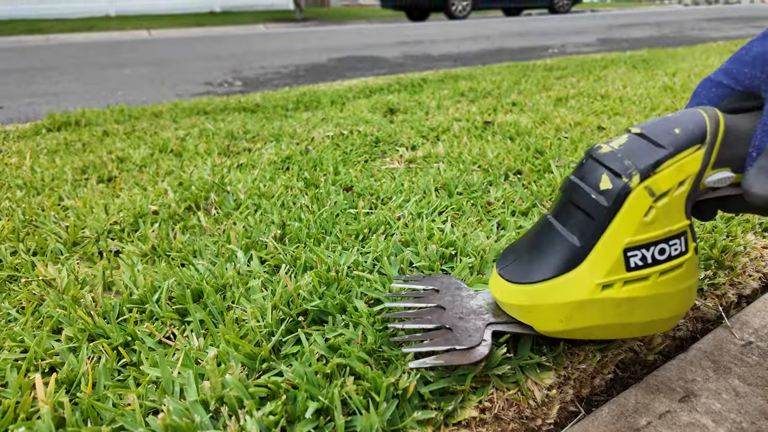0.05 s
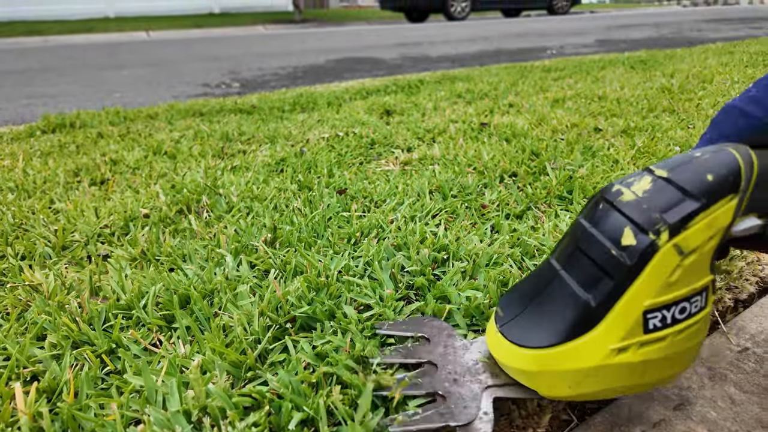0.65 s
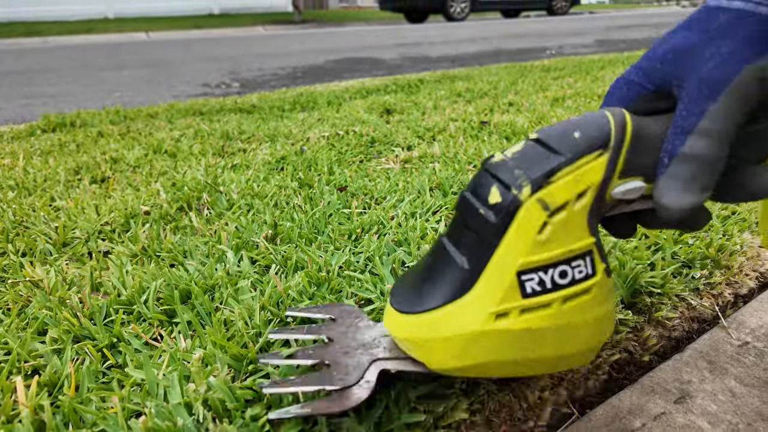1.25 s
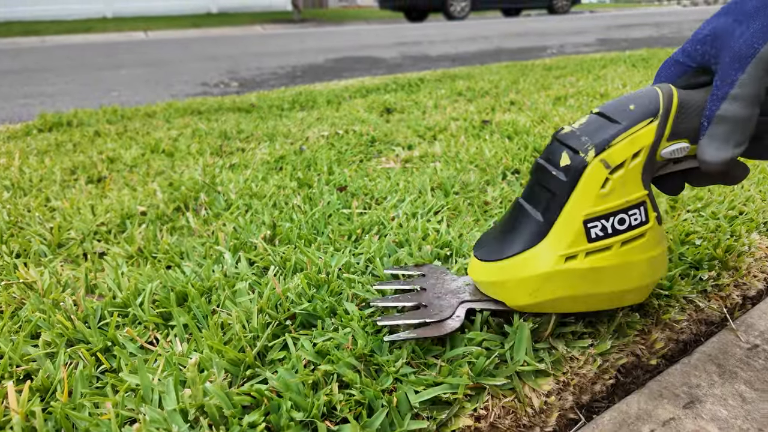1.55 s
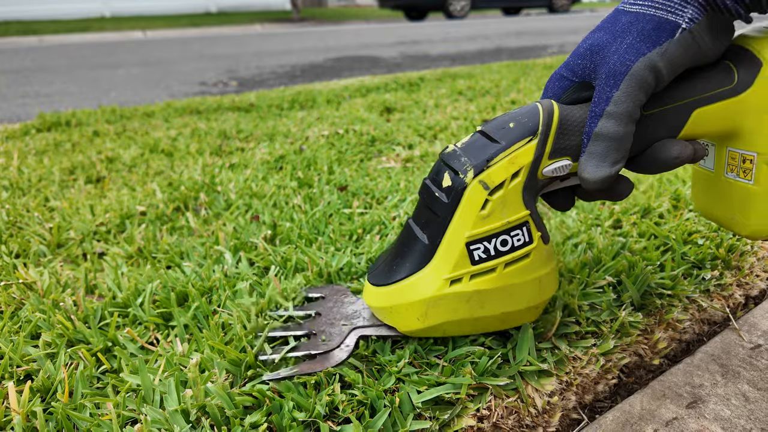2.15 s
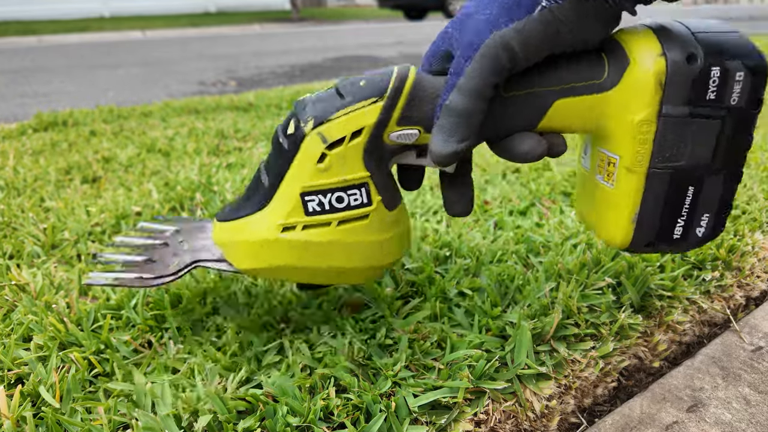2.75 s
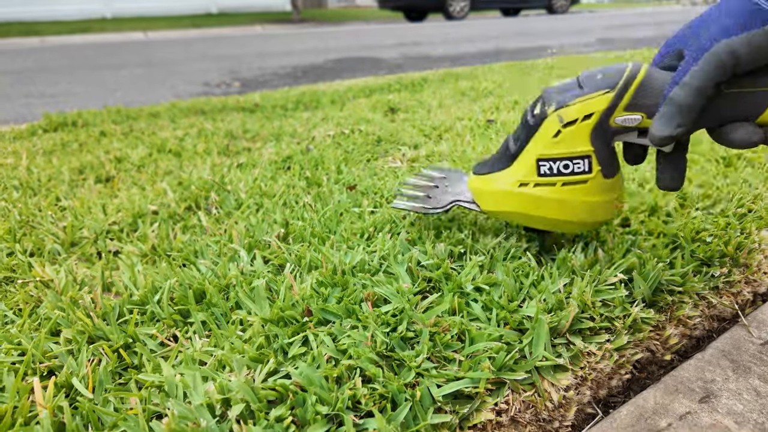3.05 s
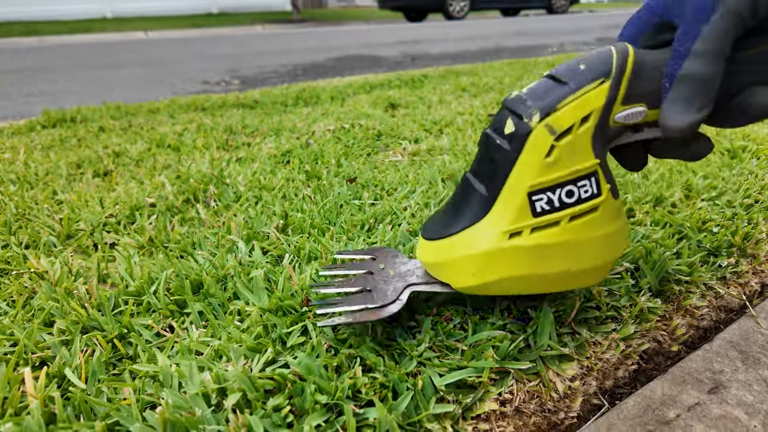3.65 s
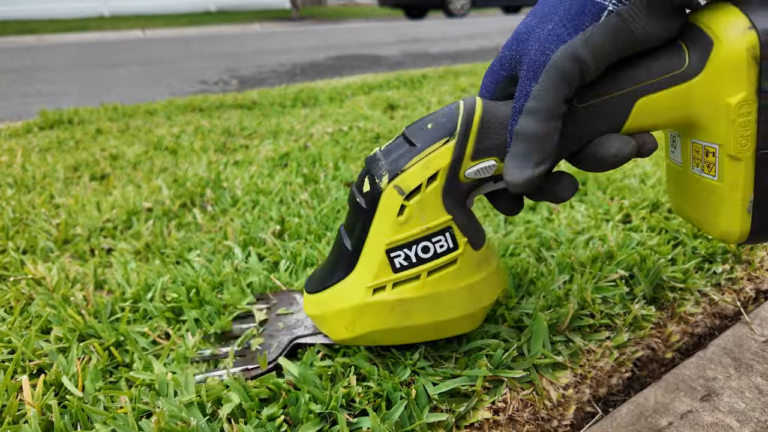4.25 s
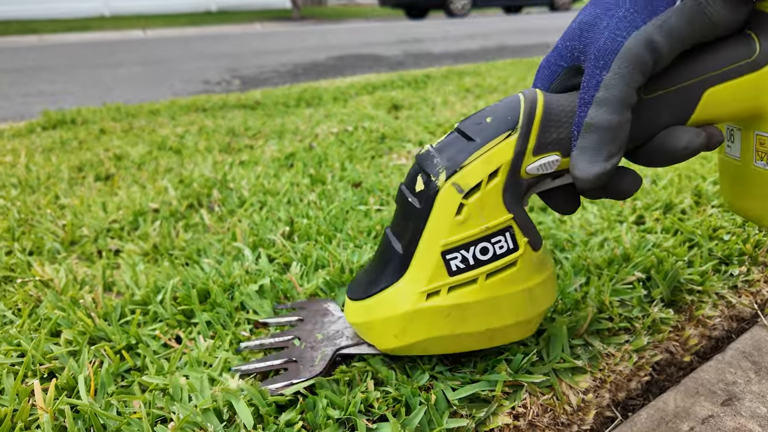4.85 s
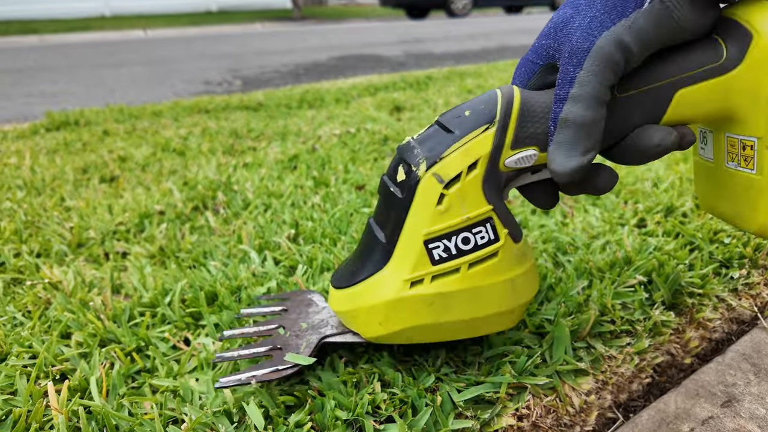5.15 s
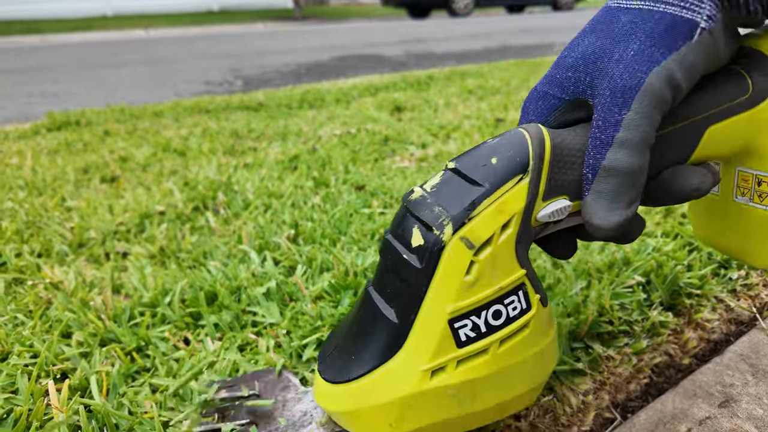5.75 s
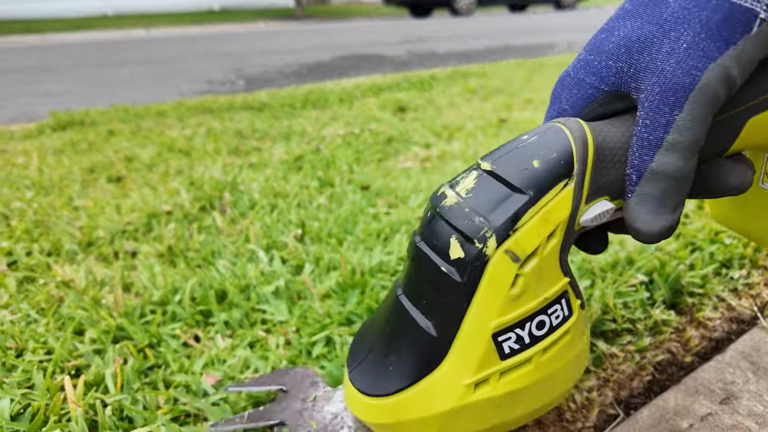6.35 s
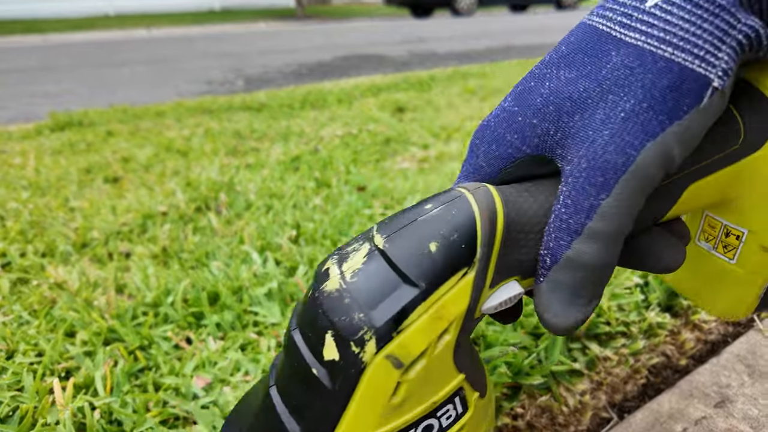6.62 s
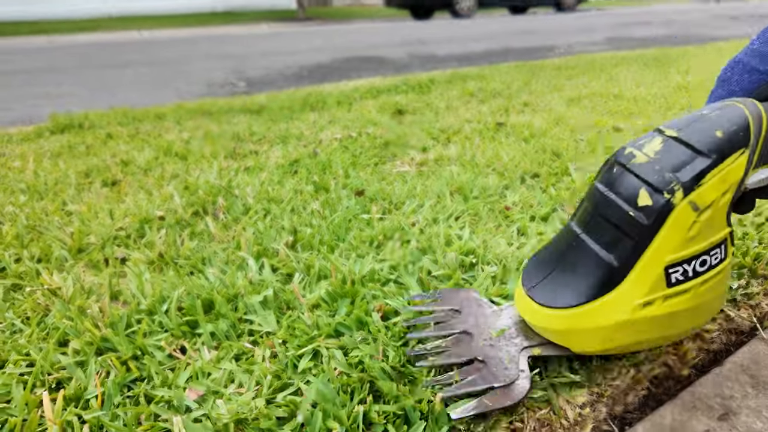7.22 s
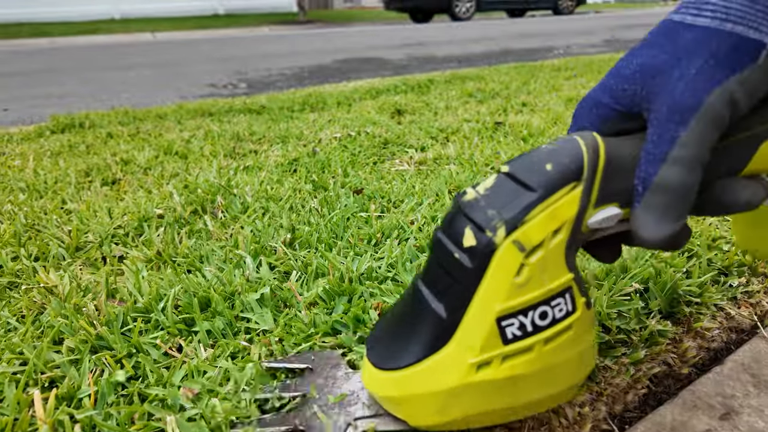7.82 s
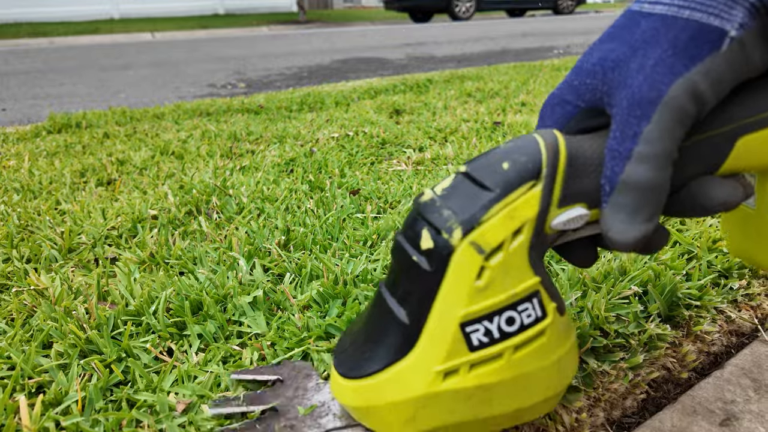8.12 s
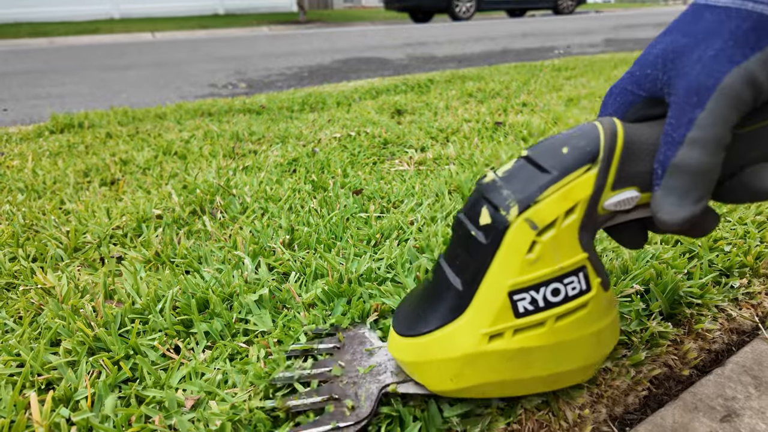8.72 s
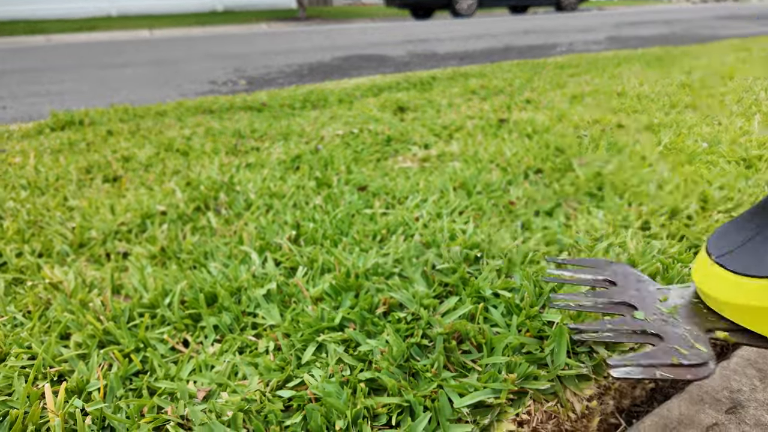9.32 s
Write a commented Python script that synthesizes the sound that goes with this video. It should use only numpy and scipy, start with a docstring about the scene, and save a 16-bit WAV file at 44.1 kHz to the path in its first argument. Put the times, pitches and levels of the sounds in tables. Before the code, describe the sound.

Cordless grass shears are already running close to the microphone, outdoors at a lawn edge. Their steel blades scrape and clash in a fast, even chatter, about seventeen strokes a second, making a loud, bright metallic buzz. Underneath are a lower gear whine and the rattle of the plastic housing. The ringing tone shifts and grows harsher or softer as the tool moves through the grass. At about 2.8 seconds the motor cuts out: the strokes slow, the whine falls, and the clatter dies away by roughly 3.6 seconds, leaving only a very faint, distant street rumble. Short, sharp trigger clicks come at about 3.7 and 3.8 seconds, and the shears jump straight back to full speed. They buzz and rattle continuously, with small swells in sharpness, until about 9.1 seconds, when they begin to wind down again.

```python
"""Cordless grass shears trim a lawn edge, close by, beside a quiet street.
A geared motor swings one toothed blade across another: each stroke knocks, scrapes, and clashes where
the teeth cross. The gears whine and rattle the plastic housing. The trigger is let go and the drive
coasts to rest; it clicks, and the shears run again."""
import sys
import numpy as np
from scipy import signal
from scipy.fft import rfft, irfft
from scipy.io import wavfile
from scipy.ndimage import uniform_filter1d

SR = 44100
rng = np.random.default_rng(int(sys.argv[2]) if len(sys.argv) > 2 else 0)


def transcribe(u):
    """Save the signal u as a 16-bit wav file named by the first command-line argument.

    u: samples, shape (n,) or (channels, n), limited to [-1, 1]; the rate is SR.
    q: integer samples, one column per channel.
    """
    v = np.clip(np.atleast_2d(u).T, -1, 1)
    q = np.round(v * 32767).astype(np.int16)
    wavfile.write(sys.argv[1], SR, q)


N = 413658
TIME_S = np.arange(N) / SR
FULL_TURNS_PER_S = 17

# Steel rubbing on steel. Each row: share of a crank turn, relative level in dB.
RUB_CYCLE = [(0, 7.5), (.06, -4), (.17, 7), (.3, -9), (.36, -16), (.41, -33.5), (.46, -13), (.48, -4.5),
             (.58, -1.5), (.7, 1), (.8, 0), (.86, -18), (.92, -23.5), (.99, -13.5)]
# Blade resonances. Each row: centre in Hz, width in Hz, gain in dB.
STEEL_MODES = [(2294, 153, 0), (2472, 186, 2), (3058, 213, 2), (3340, 250, 0.5), (3514, 330, -3.5),
               (4059, 290, -3), (4873, 430, -2), (5700, 510, -0.5), (6148, 390, 0), (6780, 410, -1.5),
               (7272, 260, 4), (8140, 760, -8.5), (9050, 330, -5.5), (10000, 600, -9.5),
               (10710, 980, -14.5), (12070, 880, -10), (14550, 1500, -16.5)]
# Housing resonances. Each row: centre in Hz, width in Hz, gain in dB.
SHELL_MODES = [(264, 82, -14), (391, 94, -3.5), (493, 118, -1), (634, 118, -3), (740, 91, -5.5),
               (956, 110, -4.5), (1122, 260, -7.5), (1412, 200, -6), (1705, 113, -5), (2040, 220, -11)]


def blades(turn, speed, reach, grit_db=3.5, clink_db=1.38, return_db=1.0, clash_per_bite=.45):
    """Gritty rubbing and blows keep the dense steel modes ringing; they fall quiet at each reversal."""
    # Blade bands. Each row: low and high edge in Hz, t60 in s, knock, clash and whirr weights in dB.
    bands = [(2020, 4080, 0.04, -0.5, -5.5, -8), (3900, 5960, 0.027, -1, 2.5, -14.5),
             (6146, 8200, 0.022, 5, 10, -19), (8132, 11060, 0.0085, 13, 7, -8),
             (10540, 14700, 0.021, 3.5, 9, -21)]
    # One row per band: base level in dB, dB per dB of bite, exponent of speed.
    band_levels = [(-30, 0.47, 0.91), (-30.5, .5, 1.3), (-30.7, 1.36, 1.83), (-36, 1.27, 1.5),
                   (-42.5, .7, 1.7)]
    # How hard the blades bite on each other and the grass. Each row: time in s, bite in dB.
    bite = [(.03, -1.5), (.18, 3), (.58, 4), (.83, 1), (1.33, 1.5), (2.78, -1.5), (3.3, -1), (3.87, 2),
            (4.18, -3.5), (4.33, -4), (4.48, -.3), (4.83, .7), (4.98, -1.5), (5.53, 1.7), (6.03, -1.5),
            (6.55, 1.6), (6.8, -.4), (7.28, 3), (8.13, -1.5), (8.38, 2.5), (8.63, -1.7), (8.78, 1),
            (8.93, -1.5), (9.14, 2), (9.3, 0)]
    # Balance of the 2.4 kHz ring against the 3.1 kHz ring. Each row: time in s, tilt in dB.
    ring_tilt = [(0, -3), (.6, -4), (1.7, -1.5), (2.1, 1.5), (2.85, 4.5), (3.3, -7.5), (3.95, 1),
                 (4.25, 5.5), (4.7, 0.5), (6.8, 3), (7.45, -3.5), (8.2, 1.5), (8.6, -3.5), (9, 2),
                 (9.3, -3)]
    # Spread of that tilt over the modes. Each row: frequency in Hz, share of the tilt.
    tilt_shares = [(2500, 0.54), (3050, -.45), (4060, 0.016)]
    # The moved steel is heard from another angle. Each row: frequency in Hz, gain in dB at reach 1.
    directivity = [(2400, 1.65), (3200, 1.35), (4060, 1.5), (4860, 4.5), (5680, 1.5), (6200, -3.5),
                   (6800, -5.5), (7300, -0.2), (8200, 2), (10200, 3.4), (12000, -1.7), (14500, -0.5)]
    bite_db, tilt_db = in_time(bite), in_time(ring_tilt)
    facing_hz, facing_db = np.transpose(directivity)
    clatter_speed = lagging(speed, lag_s=0.016)
    return_gain = from_db((turn % 1 > .465) * return_db)   # the return stroke pulls harder
    knocks, clashes = blows(turn, clash_per_bite * bite_db)
    rub = from_db(np.interp(turn % 1, *np.transpose(RUB_CYCLE)) + grit_db * flutter(900)) ** 2
    out = 0
    for blade_band, (level_db, bite_share, exponent) in zip(bands, band_levels):
        low_hz, high_hz, t60_s, knock_db, clash_db, whirr_db = blade_band
        fed = rub * 2 * np.log(1000) / (t60_s * SR)
        fed += knocks * from_db(knock_db) ** 2 + clashes * from_db(clash_db) ** 2
        whirr = from_db(whirr_db + 10.0 * (1 - speed))   # slow strokes sink into the gear whirr
        swing = np.sqrt(ring_down(fed * return_gain ** 2, t60_s) + whirr ** 2)
        swing /= np.sqrt(uniform_filter1d(swing ** 2, 2 * SR // FULL_TURNS_PER_S))   # like energy a turn
        steel = 0
        for hz, width_hz, db in STEEL_MODES:
            if low_hz < hz < high_hz:
                mode_db = reach * np.interp(np.log(hz), np.log(facing_hz), facing_db)
                mode_db += tilt_db * np.interp(hz, *np.transpose(tilt_shares))
                mode_db += clink_db * flutter(60)   # each blow favours other modes
                steel += from_db(mode_db) * resonate(swing * rng.standard_normal(N), [(hz, width_hz, db)])
        gain = from_db(level_db + bite_share * bite_db)
        gain *= rattle_gain(clatter_speed, exponent, stall_speed=0.23, steepness=5.7)
        out += gain * rms_one(band(steel, 0.963 * low_hz, 1.027 * high_hz))
    return out


def blows(turn, extra_clash_db, scatter_db=1.1):
    """Energy of the backlash knocks and of the tooth clashes; no two turns are alike."""
    # Each row: angle in turns, relative level in dB, spread in turns, clash share (0 knock, 1 clash).
    contacts = [(.002, 5.5, 0.00069, 0.019), (.018, 3, 0.0046, 0.25), (0.097, -1.5, 0.0083, 0.52),
                (.135, -1, 0.0061, .5), (.19, 0.5, .008, 0.61), (.24, 7.5, 0.0087, 0.94),
                (.265, 7.5, 0.0059, 0.77), (0.299, 2.5, 0.0078, 0.9), (0.471, 4, 0.0031, 0.11),
                (.49, 5, .005, 0.098), (.595, -8, .01, 0.75), (.66, 0, 0.0084, 0.37),
                (.745, 6.5, 0.013, 0.72), (0.783, 1, 0.0069, 0.96)]
    angle, level_db, spread, clash = np.transpose(contacts)
    turns = np.arange(int(turn[-1]) + 1)[:, None]
    late, harder = rng.standard_normal((2, len(turns), len(angle)))
    angles = turns + angle + spread * late
    energy = from_db(level_db + scatter_db * harder) ** 2
    knocks = at_angles(turn, angles, energy * (1 - clash))
    clashes = at_angles(turn, angles, energy * clash) * from_db(extra_clash_db) ** 2
    return knocks, clashes


def radiation_null(x, reach, width_hz=650, mid_depth_db=8.5, db_per_reach=5.5, block=256):
    """The blade radiates unevenly: a notch moves as the tool turns and deepens as it comes near."""
    # Each row: time in s, notch centre in Hz.
    null_path = [(1.4, 4000), (1.7, 4450), (2.8, 3960), (7.05, 4020), (7.3, 4900), (7.65, 5150),
                 (7.95, 4050), (8.3, 4130), (8.6, 4900), (9.38, 4530)]
    null_hz = in_time(null_path)
    depth_db = np.maximum(mid_depth_db + db_per_reach * reach, 0)
    r = np.exp(-np.pi * width_hz / SR)
    zeros = np.array([1, 0, -1]) * (1 - r * r) / 2
    state, out = np.zeros(2), x.copy()
    for i in range(0, N, block):
        poles = [1, -2 * r * np.cos(2 * np.pi * null_hz[i] / SR), r * r]
        part, state = signal.lfilter(zeros, poles, x[i:i + block], zi=state)
        out[i:i + block] -= (1 - from_db(-depth_db[i])) * part
    return out


def crank(start_turn=.158, spin_up_s=.018, coast_s=.397, friction_turns_per_s=1.2):
    """Turns made and share of full speed: a fast spin-up, then a coast against drag and friction."""
    # Trigger. Each row: press time in s, release time in s.
    runs = [(-1, 2.822), (3.813, 9.137)]
    # Crank under power. Each row: time in s, turns per s.
    motor_speed = [(0, 16.67), (.5, 16.8), (.9, 16.65), (1.8, 16.77), (2.8, 16.62), (4, 16.45), (4.8, 16.9),
                   (5.4, 16.96), (6, 16.94), (7.4, 17.17), (7.95, 16.92), (8.4, 17.16), (9.1, 17.0)]
    powered = in_time(motor_speed)
    turns_per_s = np.zeros(N)
    for press_s, release_s in runs:
        driven = powered * (1 - np.exp(-np.maximum(TIME_S - press_s, 0) / spin_up_s))
        drag = np.exp(-np.maximum(TIME_S - release_s, 0) / coast_s)
        coasting = (driven + friction_turns_per_s) * drag - friction_turns_per_s
        turns_per_s = np.where(TIME_S > press_s, np.maximum(coasting, 0), turns_per_s)
    return start_turn + np.cumsum(turns_per_s) / SR, turns_per_s / FULL_TURNS_PER_S


def housing(turn, fault_count=60, jitter_turns=0.0026, scatter_db=3.0, rub_share=0.2):
    """The same gear faults come round every turn and, with loose play, rattle the plastic shell."""
    turns = np.arange(int(turn[-1]) + 1)[:, None]
    faults = (np.arange(fault_count) + rng.random(fault_count)) / fault_count
    late, harder = rng.standard_normal((2, len(turns), fault_count))
    sizes = rng.choice([-1, 1], fault_count) * from_db(scatter_db * harder)
    ticks = at_angles(turn, turns + faults + jitter_turns * late, sizes)
    strain = from_db(rub_share * np.interp(turn % 1, *np.transpose(RUB_CYCLE)))
    loose_play = rng.standard_normal(N)
    force = strain * (rms_one(ticks) + loose_play)
    return rms_one(band(resonate(force, SHELL_MODES), 236, 2060))


def gear_hum(turn, speed, mesh_per_turn=75, waver=0.64):
    """Mesh whine sliding through the shell's resonances, unbalance shake, and the gear wheel's ring."""
    # Each row: mesh harmonic, relative level in dB on resonance, shell resonance in Hz, width in Hz.
    whine_orders = [(1, -1.5, 520, 150), (2, -10.5, 1100, 120)]
    # Each row: multiple of the crank rate, relative level in dB at full speed.
    shake_orders = [(5, -36), (6, -46.5), (7, -37), (8, -44), (11, -37.5), (12, -32.5), (15, -30),
                    (17, -30)]
    mesh_hz = mesh_per_turn * FULL_TURNS_PER_S * speed
    mesh_rad = 2 * np.pi * np.cumsum(mesh_hz) / SR + 0.51 * flutter(120)   # gear play roughens the whine
    whine = sum(from_db(db) / (1 + ((k * mesh_hz - hz) / width_hz) ** 2) * np.sin(k * mesh_rad)
                for k, db, hz, width_hz in whine_orders)
    shake = sum(from_db(db) * np.sin(2 * np.pi * (k * turn + rng.random()) + 0.7 * flutter(14))
                for k, db in shake_orders)
    wheel = [(3400, 220, 0)]   # centre Hz, width Hz, dB
    ring = from_db(-16.0) * rms_one(resonate(resonate(rng.standard_normal(N), wheel), wheel))
    return ring + np.sqrt(2) * (whine + shake * speed ** 2) * (1 + waver * flutter(70))


def trigger_clicks():
    """The trigger and the drive taking up its slack send short cracks through shell and blades."""
    # Each row: start in s, peak in dB, t60 in s, steel share from 0 to 1.
    clicks = [(3.744, -27, 0.024, 0.11), (3.766, -56, .02, 0.1), (3.8137, -26, 0.013, 0.5),
              (3.82, -29, .03, 0.1)]
    out = np.zeros(N)
    for start_s, peak_db, t60_s, steel in clicks:
        crack = rng.standard_normal(SR // 10) * from_db(-60 * TIME_S[:SR // 10] / t60_s)
        ring = (1 - steel) * resonate(crack, SHELL_MODES) + steel * resonate(crack, STEEL_MODES)
        click = band(ring, 380, 12000, order=2)
        at = round(start_s * SR)
        out[at:at + len(click)] += from_db(peak_db) * click / np.abs(click).max()
    return out


def street(level_db=-64):
    """Smooth far-off rumble."""
    # Each row: frequency in Hz, relative spectral density in dB.
    spectrum = [(18, -67), (30, -37), (53, -9), (92, -7.5), (154, -5.5), (222, -6), (312, -5), (581, -23),
                (662, -15), (1440, -26), (3410, -27), (15000, -45)]
    hz, db = np.transpose(spectrum)
    colour = from_db(np.interp(np.log(np.fft.rfftfreq(N, 1 / SR) + 1), np.log(hz), db))
    return from_db(level_db) * rms_one(irfft(rfft(rng.standard_normal(N)) * colour, N))


def rattle_gain(speed, exponent, stall_speed, steepness):
    """Grows as a power of speed; collapses below stall_speed, a share of full speed."""
    return speed ** exponent / (1 + (stall_speed / (speed + 1e-6)) ** steepness)


def at_angles(turn, angles, sizes):
    """An impulse as the crank passes each angle."""
    at = np.searchsorted(turn, angles.ravel())
    inside = (at > 0) & (at < N)
    return np.bincount(at[inside], sizes.ravel()[inside], N)


def ring_down(power, t60_s):
    """Energy fed to a part dies away; a unit blow starts at 1."""
    return signal.lfilter([1], [1, -np.exp(-2 * np.log(1000) / (t60_s * SR))], power + 1e-18)


def resonate(x, modes):
    """Parallel resonances of alternating sign."""
    out = 0
    for k, (hz, width_hz, db) in enumerate(modes):
        r = np.exp(-np.pi * width_hz / SR)
        poles = [1, -2 * r * np.cos(2 * np.pi * hz / SR), r * r]
        out += (-1) ** k * from_db(db) * (1 - r * r) / 2 * signal.lfilter([1, 0, -1], poles, x + 1e-18)
    return out


def band(x, low_hz, high_hz, order=3):
    """Causal band-pass."""
    return signal.sosfilt(signal.butter(order, [low_hz, high_hz], "band", fs=SR, output="sos"), x)


def lagging(x, lag_s):
    """First-order lag."""
    r = np.exp(-1 / (lag_s * SR))
    return x[0] + signal.lfilter([1 - r], [1, -r], x - x[0])


def flutter(per_s):
    """Random wavering of rms 1."""
    return rms_one(np.interp(TIME_S * per_s, np.arange(N), rng.standard_normal(N)))


def in_time(rows):
    """A (time in s, value) curve at every sample."""
    return np.interp(TIME_S, *np.transpose(rows))


def from_db(db):
    """Decibels to gain."""
    return 10 ** (np.asarray(db) / 20)


def rms_one(x):
    """Scale to rms 1."""
    return x / np.sqrt(np.mean(x ** 2) + 1e-20)


def scene():
    """One crank drives blades, housing and gears; clicks and street are added. Mono."""
    # The hand moves the tool to and fro. Each row: time in s, reach (about -1 far to 1 near).
    hand_path = [(0.03, 0.23), (0.13, -0.71), (0.83, -0.22), (1.13, 1.3), (1.38, 1.2), (1.58, -1.3),
                 (2.78, 0.21), (2.88, -0.75), (5.63, 0.067), (6.63, 1.06), (7.68, -0.4), (8.23, 0.92),
                 (8.38, -0.37), (9.16, -0.44)]
    reach = in_time(hand_path)
    turn, speed = crank()
    steel = radiation_null(blades(turn, speed, reach), reach)
    shell_gain = from_db(-37.5) * rattle_gain(speed, exponent=0.4, stall_speed=0.22, steepness=4.5)
    shell = shell_gain * (housing(turn) + gear_hum(turn, speed))
    return (steel + shell + trigger_clicks() + street())[None]


def record(dry, cutoff_hz=15900):
    """Steep low-pass."""
    return signal.sosfilt(signal.ellip(10, .2, 80, cutoff_hz, fs=SR, output="sos"), dry)


dry = scene()
out = record(dry)
transcribe(out)
```